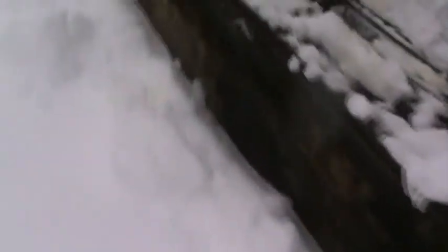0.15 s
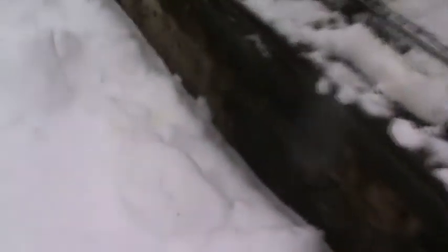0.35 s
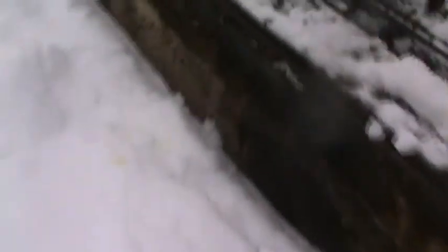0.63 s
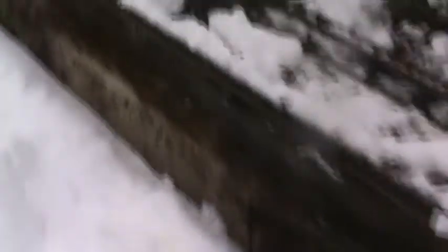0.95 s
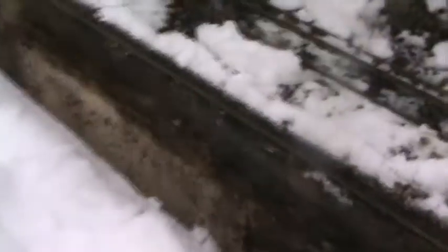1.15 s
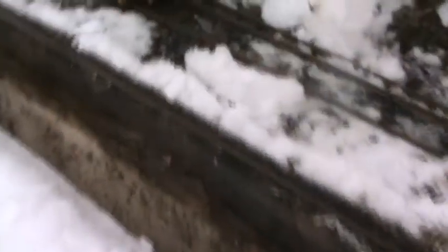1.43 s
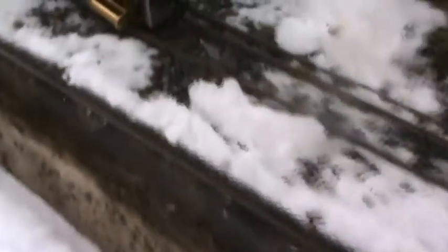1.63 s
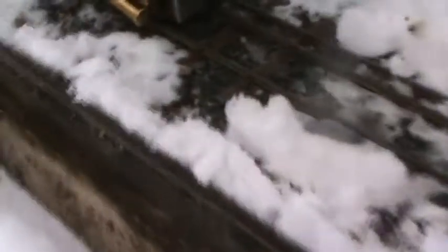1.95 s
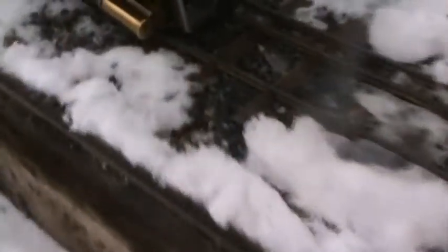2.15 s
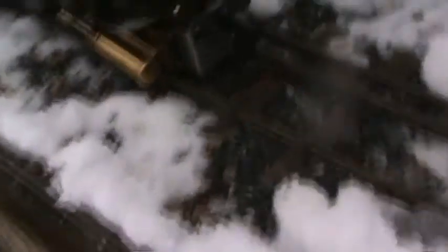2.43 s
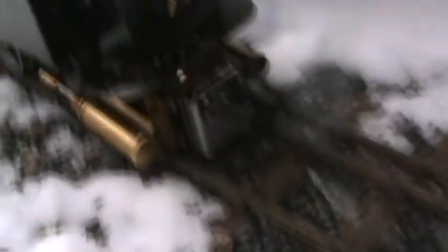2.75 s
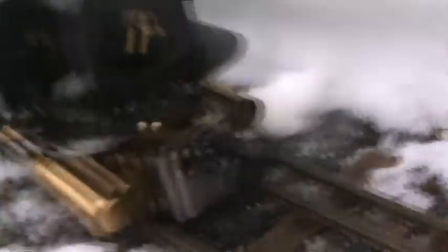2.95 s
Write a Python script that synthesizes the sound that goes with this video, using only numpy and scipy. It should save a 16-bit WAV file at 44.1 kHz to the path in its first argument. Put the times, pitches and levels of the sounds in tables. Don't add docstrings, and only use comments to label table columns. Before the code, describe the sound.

Steam jet hissing from a small locomotive's cylinder outdoors in snow, rising over the first second then steady and loud; early clicks of a slipping grip, later soft finger thuds on the hand-held camera.

```python
import sys
import numpy as np
from scipy import signal
from scipy.io import wavfile
from scipy.ndimage import uniform_filter1d, map_coordinates

SR = 44100
rng = np.random.default_rng(int(sys.argv[2]) if len(sys.argv) > 2 else 0)


def gain_from_db(level_db):
    decades = np.asarray(level_db, float) / 20
    return 10 ** decades


def unload_audio(sound):
    columns = np.transpose(np.atleast_2d(sound))
    steps = np.round(np.clip(columns, -1, 1) * 32767)
    wavfile.write(sys.argv[1], SR, steps.astype(np.int16))


N = 136710
TOP_HZ = 15720


def unit(x):
    return x / np.sqrt(np.mean(x ** 2) + 1e-20)


def along(points, hz):
    f, v = np.transpose(points)
    return np.interp(np.log(hz + 1), np.log(f + 1), v)


def curves(rows, t):
    s, *cols = np.transpose(rows)
    return [np.interp(t, s, c) for c in cols]


def wobble(rate_hz, t):
    return map_coordinates(rng.standard_normal(200), [t * rate_hz])


def patches(shape, bins, frames):
    field = uniform_filter1d(rng.standard_normal(shape), size=bins, axis=0)
    return unit(uniform_filter1d(field, size=frames, axis=1))


def noise_sheet():
    hz, t, z = signal.stft(rng.standard_normal((2, N)), SR, nperseg=1024)
    return hz[:, None], t, z


def spread(z, wide, lean=0):
    side_z = z[1] * wide + z[0] * lean
    mid, side = signal.istft(np.array([z[0], side_z]), nperseg=1024)[1][:, :N]
    return np.array([mid + side, mid - side])


def resonance(hz, centre_hz, width_hz):
    return 1j * hz * width_hz / (centre_hz ** 2 - hz ** 2 + 1j * hz * width_hz)


def jet_colour(hz, t, facing):
    # Hz, dB per Hz.
    aside = [(880, -39), (1500, -25), (2070, -19.5), (3970, -12), (4600, -14), (6950, -3.5), (8130, -5),
             (13300, -2.5), (15700, -2)]
    # Hz, dB per Hz.
    front = [(880, -53), (1500, -38.5), (3390, -19), (4010, -2.5), (4380, -4), (5170, 7), (6810, -4),
             (11900, -1.5), (15700, -15.5)]
    view_db = (1 - facing) * along(aside, hz) + facing * along(front, hz)
    # time in s, mouth in Hz, fizz above shelf in dB, body below shelf in dB.
    turn = [(0, 6760, -1, 0.5), (.3, 6940, 1.5, 1), (.6, 6900, 4.5, -0.5), (.95, 6920, 4.5, -0.5),
            (1.3, 6830, 4.5, -2), (1.6, 6780, 1, -2.5), (1.9, 6850, 6.5, 0.5), (2.2, 6820, -1.5, -0.4),
            (2.5, 6570, -3, -0.5), (2.75, 6770, 0.5, .8), (2.95, 6940, -4, 0.5), (3.1, 6900, -7, 6)]
    mouth_hz, fizz_db, body_db = curves(turn, t)
    fizz_shelf_hz, body_shelf_hz = 13800, 4180
    fizz = fizz_db / (1 + (fizz_shelf_hz / (hz + 1)) ** 12)
    body = body_db / (1 + (hz / body_shelf_hz) ** 6)
    return gain_from_db(view_db) * (hz < TOP_HZ) * gain_from_db(fizz + body), mouth_hz


def mouth_modes(hz, t, mouth_hz, mouth_db):
    # Hz, width in Hz, level in dB, centre in s, half length in s.
    shoulders = [(4200, 680, -5.5, .15, 0.32), (5370, 310, -6, 2.95, 0.55), (9800, 330, -4, 0.5, 0.69),
                 (12100, 240, -12, 2.3, 0.25), (12900, 400, -6, .55, 0.26), (10350, 300, -5, 1.5, .3),
                 (13200, 340, -18, 1.25, 0.26), (8700, 1000, -8, 3.0, .2), (10800, 690, -4, 2.8, 0.15)]
    modes = gain_from_db(mouth_db) * resonance(hz, mouth_hz, width_hz=400)
    for centre_hz, width_hz, db, at_s, half_s in shoulders:
        lobe = gain_from_db(db) * np.exp(-((t - at_s) / half_s) ** 2)
        modes = modes + lobe * resonance(hz, centre_hz, width_hz)
    return modes


def surface_echoes(hz, t):
    # time in s, delay in ms, strength 0-1.
    snow = [(0, .895, .18), (.3, .91, .3), (.75, .962, .3), (1.1, 1.0, .05), (1.8, 1.15, .13),
            (2.1, 1.195, .2), (2.5, 1.2, .18), (2.62, 1.1, 0), (2.72, 1.022, .25), (3.1, 1.02, .2)]
    # time in s, delay in ms, strength 0-1.
    track_bed = [(0, 2.3, .04), (.6, 2.25, .1), (1.2, 2.15, .16), (1.8, 2.08, .12), (2.15, 2.05, .25),
                 (2.5, 2.06, .2), (2.7, 2.1, .03), (3.1, 2.1, .03)]
    # time in s, delay in ms, strength 0-1.
    frame = [(0, 0.9, 0), (.6, 0.67, 0.05), (1.3, 0.63, 0.04), (2.0, 0.8, 0), (2.6, 0.59, 0.05),
             (3.1, 0.58, 0.1)]
    echoes = 0
    for surface in (snow, track_bed, frame):
        delay_ms, strength = curves(surface, t)
        echoes = echoes + strength * np.exp(-2j * np.pi * hz * delay_ms / 1000)
    full_hz = 11600
    return echoes * np.clip(hz / full_hz, .35, 1)


def jet():
    # time in s, jet level in dB, facing the jet 0-1, mouth resonance in dB.
    approach = [(0, -25, .3, 8.5), (.3, -22.5, 0.4, 0), (.55, -19.5, 0.44, 2), (.8, -16.5, 0.33, 6),
                (1.0, -14.5, 0.42, 6), (1.17, -13, 0.32, 7), (1.36, -12.5, 0.34, 9), (1.47, -13.5, 0.26, 7),
                (1.76, -12.5, 0.34, 5), (2.0, -12, 0.3, 4), (2.3, -12.5, 0.24, -2),
                (2.55, -12.5, 0.25, 0.5), (2.75, -12, 0.33, -4), (2.84, -13.5, 0.24, -4),
                (3.02, -13.5, 0.28, -20), (3.1, -15.5, 0.33, -14)]
    # Hz, side under mid in dB.
    jet_wide = [(1500, -5), (3000, -9), (4500, -13.5), (6000, -17.5), (10000, -15.5), (14000, -12.5)]
    patchy_db, flutter_db = 1.05, 0.21
    hz, t, z = noise_sheet()
    level_db, facing, mouth_db = curves(approach, t)
    colour, mouth_hz = jet_colour(hz, t, facing)
    modes = mouth_modes(hz, t, mouth_hz, mouth_db)
    patchy = gain_from_db(patchy_db * patches(z.shape[1:], bins=5, frames=20))
    shape = colour * np.abs(1 + modes) * np.abs(1 + surface_echoes(hz, t)) * patchy
    shape = shape / np.sqrt(np.mean(shape ** 2, axis=0))
    level = gain_from_db(level_db + flutter_db * wobble(14.1, t))
    return spread(z * shape * level, gain_from_db(along(jet_wide, hz)))


def knocks(rows, rise_cycles, overtone_db):
    overtone_ratio, rattle_db, rattle_s = 1.55, -18, .025
    out, t = np.zeros(N + SR), np.arange(SR // 8) / SR
    bins_hz = np.fft.fftfreq(len(t), 1 / SR)
    for s, db, hz, t60 in rows:
        swing = np.sin(2 * np.pi * hz * t)
        swing = swing + gain_from_db(overtone_db) * np.sin(2 * np.pi * overtone_ratio * hz * t)
        swing = swing * gain_from_db(-60 * t / t60) * (1 - np.exp(-t * hz / rise_cycles))
        noise_z = np.fft.fft(rng.standard_normal(len(t)))
        noise = np.real(np.fft.ifft(noise_z * resonance(bins_hz, hz, 2.9 * hz) ** 2))
        rattle = gain_from_db(rattle_db - 60 * t / (t60 + rattle_s)) * unit(noise) * (1 - np.exp(-t * hz))
        start = round((s - .2 / hz) * SR)
        out[start:][:len(t)] += gain_from_db(db) * (swing / np.abs(swing).max() + rattle)
    return out[:N]


def grip():
    # time in s, peak in dB, Hz, t60 in s.
    slips_out = [(.0865, -28, 450, .012), (.1412, -22, 330, .012), (.1593, -21, 800, .005),
                 (.1787, -9.5, 640, .008), (.1765, -20, 650, .004), (.1857, -16, 660, .012),
                 (.2078, -24, 400, .014), (.2205, -25, 380, .017), (.2297, -20, 620, .009),
                 (.2372, -10, 620, .007), (.2432, -24, 400, .012), (.2492, -16, 560, .014),
                 (.2545, -21, 446, .014), (.2635, -25, 358, .03), (.2775, -29, 396, .024),
                 (.7323, -12, 520, .005), (.7288, -22, 600, .004), (.846, -32, 250, .016),
                 (.8835, -29, 350, .012), (.899, -32, 400, .01), (1.55, -26, 420, .02),
                 (3.0012, -23, 300, .01), (3.0163, -25.5, 220, .022)]
    # time in s, peak in dB, Hz, t60 in s.
    slips_in = [(.1779, -15, 700, .003), (.2364, -17, 700, .003), (.1601, -20, 500, .004),
                (.7301, -14, 520, .006), (.7334, -10.5, 330, .014), (.7405, -16, 420, .013),
                (.746, -18, 330, .015), (.7335, -19, 950, .009), (.7515, -19, 330, .014),
                (.7507, -24, 1000, .012), (.763, -29, 300, .02), (3.0028, -23, 220, .022),
                (.2296, -26, 1150, .008), (.131, -31, 1100, .015), (.805, -30, 920, .025),
                (.797, -31, 950, .012), (.816, -33, 850, .015)]
    # time in s, peak in dB, Hz, t60 in s.
    thuds = [(.143, -29, 130, .082), (.178, -28.5, 130, .073), (.735, -30.5, 124, .05),
             (2.322, -25.5, 160, .06), (2.46, -37.5, 222, .04), (2.8765, -24.5, 165, .04),
             (2.8835, -30, 200, .07), (2.955, -31, 120, .05), (2.941, -35, 120, .05), (2.9, -37, 70, .2),
             (.8, -37, 130, .15), (2.99, -33, 170, .08), (3.07, -38, 90, .06)]
    slip_low_hz, slip_left_db, shell_top_hz = 120, 3.6, 1550
    slips = knocks(slips_out, .43, overtone_db=-6) - knocks(slips_in, .43, overtone_db=-6)
    high_pass = signal.butter(1, slip_low_hz, "high", fs=SR, output="sos")
    slips = signal.sosfiltfilt(high_pass, slips)
    both = slips * gain_from_db([[0], [-slip_left_db]]) + knocks(thuds, 1, overtone_db=-10)
    low_pass = signal.butter(4, 1.34 * shell_top_hz, fs=SR, output="sos")
    return signal.sosfiltfilt(low_pass, both)


def drones():
    # Hz, level in dB, centre in s, half length in s.
    hums = [
        (60, -52, 2.7, 1.8),
        (107.3, -48, 1.1, 0.4),
        (143, -50, 1.5, 0.47),
    ]
    t = np.arange(N) / SR
    out = np.zeros(N)
    for hz, db, at_s, half_s in hums:
        swell = gain_from_db(db) * np.exp(-((t - at_s) / half_s) ** 2)
        out += swell * np.sin(2 * np.pi * hz * t + 1.4 * wobble(9.4, t))
    return out


def outdoors():
    # Hz, dB per Hz.
    floor = [(12, -37), (20, 6), (107, -5), (180, -9.5), (500, -8), (1200, -7), (1800, -10), (3000, -14.5),
             (5500, -120)]
    # time in s, level in dB.
    floor_level = [(0, -42.5), (.6, -41), (1.2, -40.5), (1.8, -39), (2.4, -40.5), (2.8, -41), (3.1, -40)]
    # Hz, side under mid in dB.
    floor_wide = [(30, -20), (150, -14), (400, -9), (800, -5), (1300, -4), (2500, -4)]
    # Hz, share of mid in side.
    floor_left = [(100, 0), (300, .06), (700, .14), (1300, .12)]
    # centre in Hz, width in Hz, dB re floor, centre in s, half length in s.
    far_roar = (525, 51, 4, 1.97, 0.36)
    hz, t, z = noise_sheet()
    level_db, = curves(floor_level, t)
    roar_hz, width_hz, roar_db, at_s, half_s = far_roar
    roar = 1 + gain_from_db(roar_db) * np.exp(-((t - at_s) / half_s) ** 2 - ((hz - roar_hz) / width_hz) ** 2)
    bed = gain_from_db(along(floor, hz))
    bed = bed / np.sqrt(np.mean(bed ** 2)) * gain_from_db(level_db) * roar
    return spread(z * bed, gain_from_db(along(floor_wide, hz)), along(floor_left, hz)) + drones()


def scene():
    return jet() * gain_from_db([[.2], [-.2]]) + grip() + outdoors() * gain_from_db([[.4], [-.4]])


def fold_treble(x):
    # time in s, width left 0-1.
    narrows = [(0, 0.87), (2.15, 0.67), (2.22, 0.1), (2.33, 0.5), (2.37, 1), (2.44, 0.3), (2.72, 0.2),
               (2.78, 0.7), (3.1, 0.6)]
    # start in s, length in s, lower edge in Hz.
    wide_open = [(0.167, 0.056, 1500), (0.259, 0.045, 1500), (0.553, 0.052, 1500), (0.896, 0.046, 1500),
                 (1.068, 0.049, 1500), (1.238, 0.13, 1500), (1.453, 0.044, 3750), (1.584, 0.088, 2260),
                 (1.752, 0.13, 2750), (1.964, 0.088, 3250), (2.091, 0.048, 4480), (2.341, 0.058, 1500),
                 (2.765, 0.063, 1500), (2.898, 0.054, 1500)]
    # centre in s, lower edge in Hz, upper edge in Hz, side gain in dB.
    wide_bursts = [
        (1.198, 5400, 7700, 16),
        (1.197, 10400, 11700, 11),
        (2.18, 7100, 8200, 17),
        (2.25, 5200, 6930, 16),
        (2.855, 4260, 6200, 14),
    ]
    block_s, stereo_below_hz = 0.021, 1400
    hz, t, z = signal.stft((x[0] - x[1]) / 2, SR, nperseg=1024, noverlap=768)
    keep = (hz[:, None] < stereo_below_hz) * curves(narrows, t)[0]
    spans = [(*row, TOP_HZ, 0) for row in wide_open]
    spans += [(s - block_s / 2, block_s, lo, hi, db) for s, lo, hi, db in wide_bursts]
    for s, long_s, lo, hi, db in spans:
        fade = np.clip(np.minimum(t - s, s + long_s - t) / block_s * 2 + .5, 0, 1)
        keep = np.maximum(keep, gain_from_db(db) * np.outer((hz > lo) & (hz < hi), fade))
    side = signal.istft(z * keep, nperseg=1024, noverlap=768)[1][:N]
    return x.mean(axis=0) + np.array([side, -side])


def thin_valley(x):
    # time in s, centre in Hz, half width in Hz, share of bands emptied 0-1.
    valley = [(0, 2200, 600, .12), (.6, 2200, 700, .12), (.8, 2000, 600, .03), (1.3, 2100, 700, .07),
              (1.7, 2100, 800, .13), (2.1, 1650, 380, .2), (2.6, 1600, 330, .2), (3.1, 1650, 330, .2)]
    # start in s, length in s, centre in Hz.
    dropouts = [(0, .1, 1920), (1.62, .1, 1540), (1.8, .2, 1510), (2.0, .27, 1545), (2.13, .22, 1810),
                (2.4, .1, 1800), (2.44, .07, 1650), (2.49, .19, 1470), (2.7, .07, 1340), (2.83, .07, 1370),
                (2.86, .15, 1710), (3.0, .1, 1600), (3.05, .06, 1800)]
    empty_db, dropout_half_hz = -22, 46
    hz, t, z = signal.stft(x, SR, nperseg=2048, noverlap=1536)
    centre_hz, half_hz, share = curves(valley, t)
    field = patches(z.shape[1:], bins=3, frames=9)
    chance = share * np.exp(-((hz[:, None] - centre_hz) / half_hz) ** 4)
    empty = 1 / (1 + np.exp(-1.7 * field)) < chance
    for s, long_s, at_hz in dropouts:
        empty = empty | np.outer(np.abs(hz - at_hz) < dropout_half_hz, (t >= s) & (t < s + long_s))
    return signal.istft(z * gain_from_db(empty_db * empty), nperseg=2048, noverlap=1536)[1][:, :N]


def band_limit(x):
    return signal.sosfilt(signal.butter(12, 15750, fs=SR, output="sos"), x)


def record(dry):
    clipped = np.clip(dry, -1, 1)
    mix = thin_valley(fold_treble(clipped))
    return band_limit(mix)


dry = scene()
out = record(dry)
unload_audio(out)
```